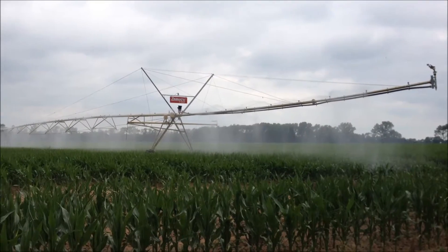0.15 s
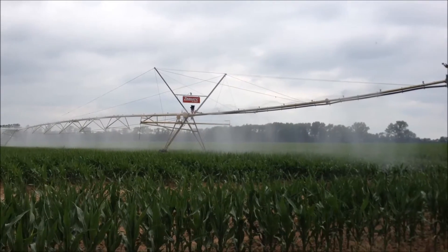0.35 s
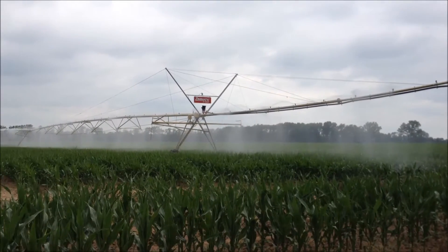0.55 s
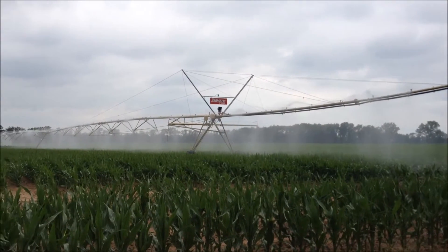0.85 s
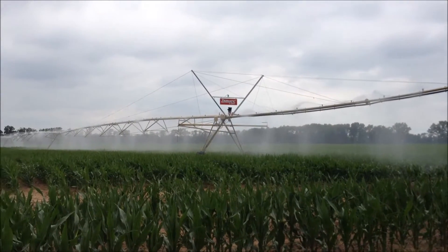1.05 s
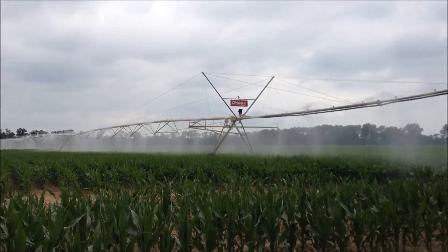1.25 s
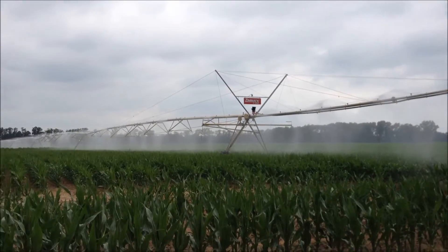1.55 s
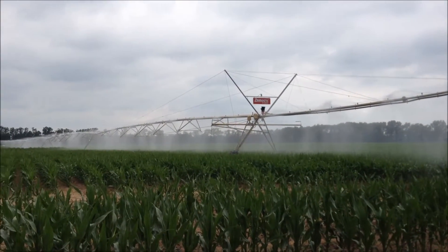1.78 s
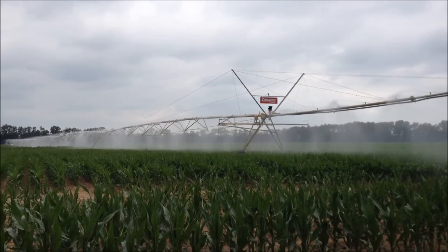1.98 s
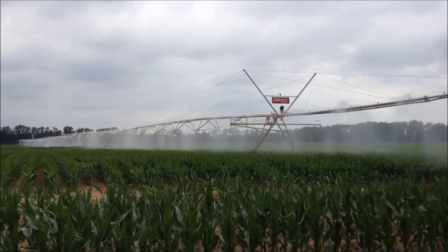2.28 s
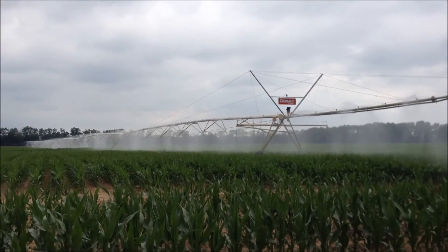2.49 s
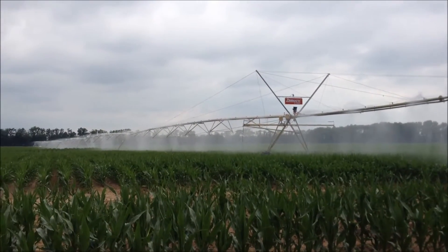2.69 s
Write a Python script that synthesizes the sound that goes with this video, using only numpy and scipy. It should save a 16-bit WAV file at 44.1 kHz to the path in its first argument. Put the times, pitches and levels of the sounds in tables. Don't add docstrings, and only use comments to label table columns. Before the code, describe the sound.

A long irrigation boom sprays corn outdoors: constant broadband hiss over dense fine patter on leaves, with faint low rumble and pump hum. Heard from tens of metres by one camera microphone, nearly mono, slightly grainy.

```python
import sys
import numpy as np
from scipy import signal
from scipy.fft import rfft, irfft, dct, next_fast_len
from scipy.io import wavfile
from scipy.ndimage import uniform_filter1d

SR = 44100
rng = np.random.default_rng(int(sys.argv[2]) if len(sys.argv) > 2 else 0)


def gain_from_db(level_db):
    decades = np.asarray(level_db, float) / 20
    return 10 ** decades


def waveform_to_disk(signal):
    frames = np.transpose(np.atleast_2d(signal))
    scaled = np.clip(frames, -1, 1) * 32767
    samples = np.round(scaled).astype(np.int16)
    wavfile.write(sys.argv[1], SR, samples)


N = 124803
FFT_SIZE = next_fast_len(N)

# pitch_hz, density_db (per Hz)
FIELD_COLOUR = [(15, -67), (25, -27), (59, -20), (167, -0.5), (222, -3), (264, -1.5), (340, -14.5),
                (440, -30), (750, -120)]
# pitch_hz, width_hz, level_db
PUMP_LINES = [(93, 8, -89.5), (138.3, 7.2, -78.5), (181.8, 11.4, -73)]
# middle_s, pitch_hz, level_db, length_s
SOIL_PLOPS = [
    (.30, 268.7, -63.5, .25),
    (.895, 856, -55.5, 0.029),
    (.90, 799, -59.5, 0.041),
    (1.52, 190, -64, 0.068),
    (1.7, 170.6, -68.5, 0.45),
    (2.14, 167.5, -66, 0.12),
    (2.35, 145.5, -69.5, 0.095),
    (2.194, 784, -62.5, .08),
    (2.798, 1022, -62, 0.062),
]
# pitch_hz, density_db (per Hz)
LEAF_COLOUR = [(190, -40.5), (330, -5.5), (566, -4), (778, 0), (1090, -4.5), (1800, -0.5), (2420, 0),
               (3300, -11), (4290, -42.5), (7260, -120)]
# pitch_hz, density_db (per Hz)
HISS_FACING = [(3300, -18), (4100, -7), (4700, -3), (7600, -1), (8800, -11.5), (10700, -3), (12300, -7.5),
               (15330, -10)]
# pitch_hz, density_db (per Hz)
HISS_MIDWAY = [(3300, -12.5), (4100, -5.5), (4500, 0), (7600, -2.5), (8800, -10), (10700, -1.5),
               (12300, -6.5), (15330, -6)]
# pitch_hz, density_db (per Hz)
HISS_AWAY = [(3300, -10.5), (4100, -3), (4500, -3.5), (7700, -2), (9200, -11), (10700, -5.5), (12300, -7.5),
             (15330, -8.5)]
# facing_hz, midway_hz, away_hz, width_hz, level_db (re hiss)
BODY_RINGS = [(5245, 5380, 5280, 350, -7), (5850, 6000, 6100, 300, -15.5), (7200, 7200, 7600, 950, -18),
              (4920, 4950, 4750, 500, -10.5), (14000, 14000, 13300, 1200, -18)]
# time_s, level_db (of the hiss), turn (0 facing, 1 midway, 2 away)
CAMERA_PAN = [(0, -48, 0.087), (.35, -48.5, 0.46), (.7, -48.5, 0.56), (1.1, -48.5, 1.13), (1.45, -48, 1.24),
              (1.72, -48.5, 1.05), (1.88, -49, 1.46), (2.1, -50, 1.6), (2.25, -48.5, 1.8),
              (2.5, -50.5, 1.6), (2.83, -50.5, 2.6)]
# pitch_hz, step_db (re smoothed spectrum)
CAMERA_STEPS = [(1000, -8), (3500, 0), (5300, -2), (6500, 1.5), (8700, 4.5), (11000, 3), (15000, 4.5)]
# middle_s, low_hz, high_hz, level_db (side re mid)
SIDE_SLIPS = [(.278, 9650, 11000, 4), (.278, 13800, 15200, 0), (.325, 13800, 15200, -3),
              (.58, 10430, 12400, 2), (.859, 13100, 14500, -1), (1.207, 6900, 8350, -2),
              (1.671, 5760, 7650, -3), (1.671, 11000, 12400, -3), (1.811, 12400, 13800, -1),
              (2.60, 8200, 10350, -5), (2.623, 12600, 13800, -4)]


def shape(x, gain):
    hz = np.maximum(np.fft.rfftfreq(FFT_SIZE, 1 / SR), 1)
    return irfft(rfft(x, FFT_SIZE) * gain(hz), FFT_SIZE)[:N]


def colour(table):
    hz, db = np.array(table, float).T
    return lambda f: gain_from_db(np.interp(np.log(f), np.log(hz), db)) * (f >= hz[0]) * (f < hz[-1])


def ring(hz, width_hz):
    return lambda f: 1 / (1 + ((f - hz ** 2 / f) / width_hz) ** 2)


def unit(x):
    return x / np.sqrt(np.mean(x ** 2))


def walk(rate_hz):
    hold = int(SR / rate_hz)
    steps = np.repeat(rng.standard_normal(N // 50), hold)[:N + hold]
    return 1.05 * uniform_filter1d(uniform_filter1d(steps, hold), hold)[:N]


def falling_water():
    drops_per_s, size_spread_db, biggest_db = 6000, 3, 9
    drop_share = 0.25
    swell_db, flicker_db, drift_db = 0.15, 0.6, 0.3
    chance = rng.random((3, N))
    size_db = np.minimum(-size_spread_db * np.log(chance[2] + 1e-9), biggest_db)
    drops = (chance[0] < drops_per_s / SR) * np.sign(chance[1] - 0.5) * gain_from_db(size_db)
    jets = rng.standard_normal(N)
    spectrum = rfft(np.sqrt(drop_share) * unit(drops) + np.sqrt(1 - drop_share) * jets, FFT_SIZE)
    swell = walk(3.25)
    place = np.clip(4 * np.log2(np.fft.rfftfreq(FFT_SIZE, 1 / SR) + 1), 28, 56)
    water = 0
    for k in range(28, 57):
        band = irfft(spectrum * np.clip(1 - abs(place - k), 0, 1), FFT_SIZE)[:N]
        water = water + band * gain_from_db(swell_db * swell + flicker_db * walk(9) + drift_db * walk(3.26))
    return water


def field_rumble(water):
    return gain_from_db(-66.5) * unit(shape(water, colour(FIELD_COLOUR)))


def far_pump():
    hum = 0
    for hz, width_hz, db in PUMP_LINES:
        line = unit(shape(rng.standard_normal(N), ring(hz, width_hz)))
        hum = hum + gain_from_db(db + 2 * walk(11)) * line
    return hum


def soil_plops(t):
    plops = 0
    for middle_s, hz, db, length_s in SOIL_PLOPS:
        since = t - middle_s
        swell = np.exp(-(2 * since / length_s) ** 2)
        plops = plops + gain_from_db(db) * swell * np.sin(2 * np.pi * hz * since * (1 + 0.3 * since))
    return plops


def leaf_patter(water):
    return gain_from_db(-55) * unit(shape(water, colour(LEAF_COLOUR)))


def nozzle_hiss(water, t):
    pan_s, pan_db, pan_turn = np.array(CAMERA_PAN, float).T
    turn = np.clip(np.interp(t, pan_s, pan_turn), 0, 2)
    hiss = 0
    for k, table in enumerate((HISS_FACING, HISS_MIDWAY, HISS_AWAY)):
        rings = sum(gain_from_db(row[4]) * unit(shape(water, ring(row[k], row[3]))) for row in BODY_RINGS)
        view = unit(unit(shape(water, colour(table))) + rings)
        hiss = hiss + np.clip(1 - abs(turn - k), 0, 1) * view
    return gain_from_db(np.interp(t, pan_s, pan_db)) * hiss


def scene():
    t = np.arange(N) / SR
    water = falling_water()
    background = field_rumble(water) + far_pump() + soil_plops(t)
    mono = background + leaf_patter(water) + nozzle_hiss(water, t)
    return np.array([mono, mono])


def camera_grain(x):
    hop, half, top_hz = 1024, 512, 15295
    count = N // hop + 2
    window = np.sin(np.pi * (np.arange(2 * hop) + 0.5) / (2 * hop))
    blocks = np.pad(x, (hop, count * hop - N), mode="reflect").reshape(-1, hop)
    frames = np.hstack([blocks[:-1], blocks[1:]]) * window
    a, b, c, d = np.split(frames, 4, axis=1)
    lines = dct(np.hstack([-c[:, ::-1] - d, a - b[:, ::-1]]), type=4, norm="ortho")
    smooth = uniform_filter1d(uniform_filter1d(lines ** 2, size=61, axis=1), size=5, axis=0)
    hz, db = np.array(CAMERA_STEPS, float).T
    f = (np.arange(hop) + 0.5) * SR / 2 / hop
    scatter_db = 1.2 * np.repeat(rng.standard_normal((len(lines), hop // 32)), 32, axis=1)
    step = np.sqrt(np.abs(smooth)) * gain_from_db(np.interp(f, hz, db) + scatter_db) + 1e-12
    lines = np.sign(lines) * np.floor(abs(lines) / step + 0.4) * step * (f < top_hz)
    u, v = np.split(dct(lines, type=4, norm="ortho"), [half], axis=1)
    frames = np.hstack([v, -v[:, ::-1], -u[:, ::-1], -u]) * window
    return (frames[1:, :hop] + frames[:-1, hop:]).ravel()[:N]


def side_slips(x):
    t, other, side = np.arange(N) / SR, x[::-1], 0
    for middle_s, low_hz, high_hz, db in SIDE_SLIPS:
        fade = np.cos(np.pi * np.clip((t - middle_s) / 0.04, -0.5, 0.5))
        side = side + gain_from_db(db) * fade * shape(other, lambda f: (f > low_hz) * (f < high_hz))
    return side


def top_cut(x):
    return signal.sosfilt(signal.butter(12, 16170, fs=SR, output="sos"), x)


def record(dry):
    mix = camera_grain(dry[0]) + side_slips(dry[0]) * np.array([[1], [-1]])
    return top_cut(mix)


dry = scene()
out = record(dry)
waveform_to_disk(out)
```